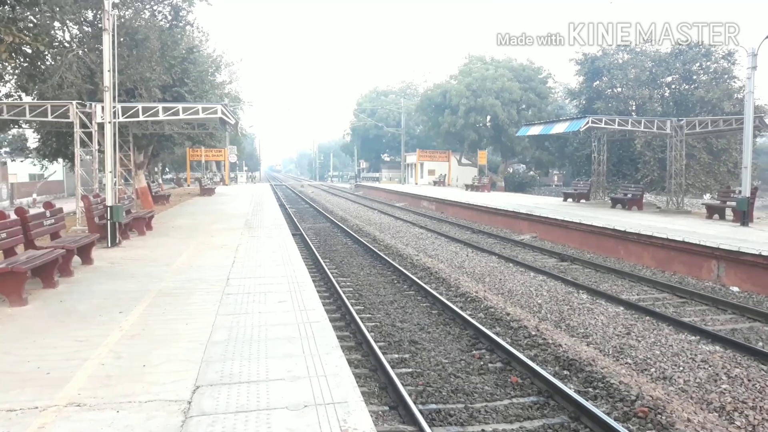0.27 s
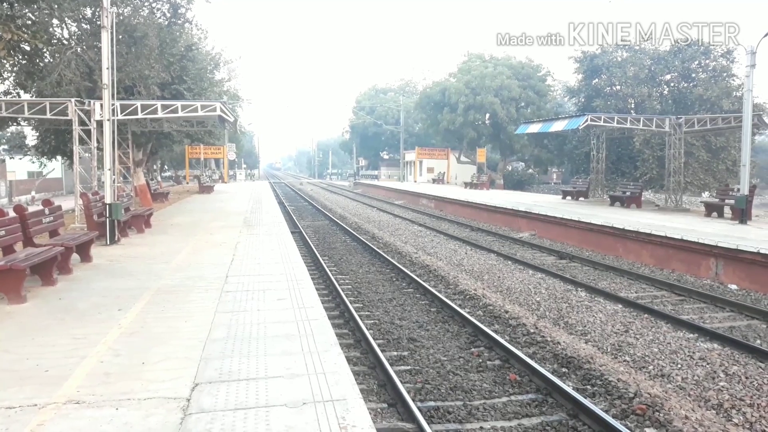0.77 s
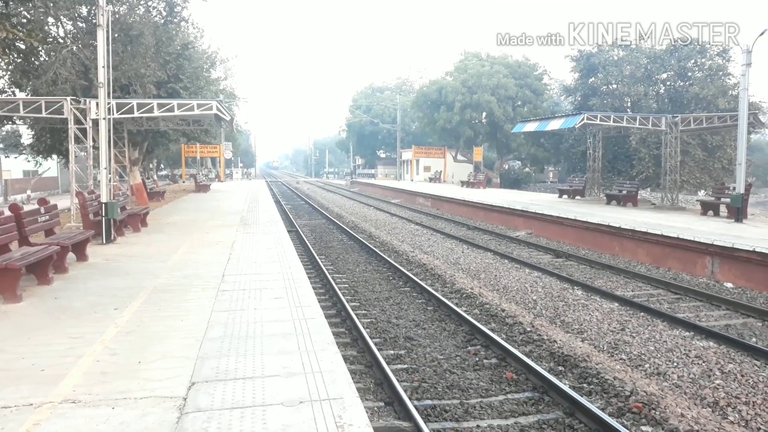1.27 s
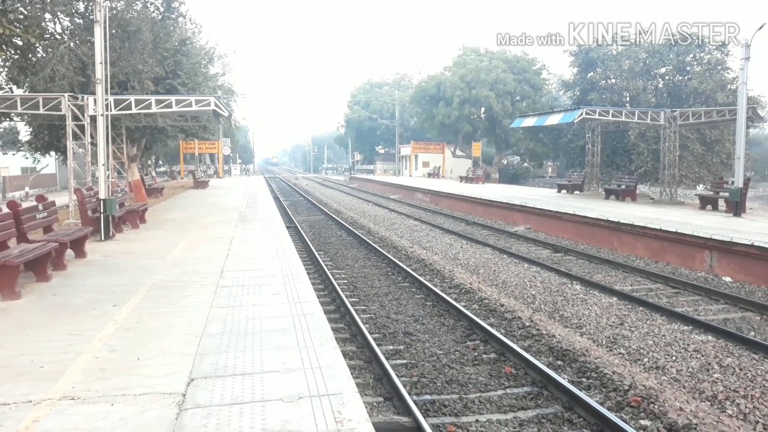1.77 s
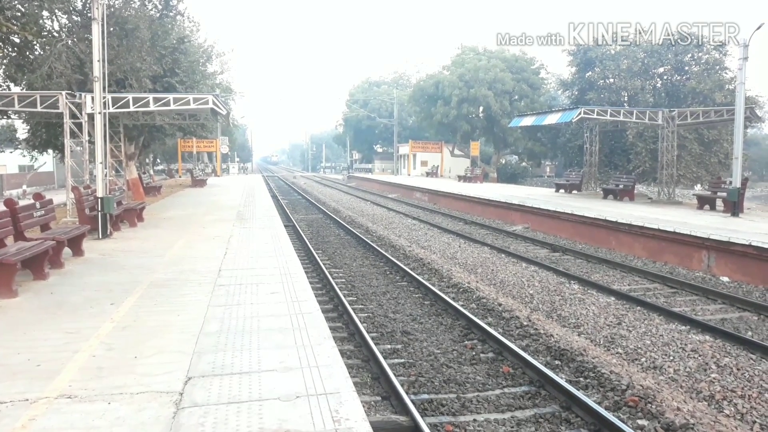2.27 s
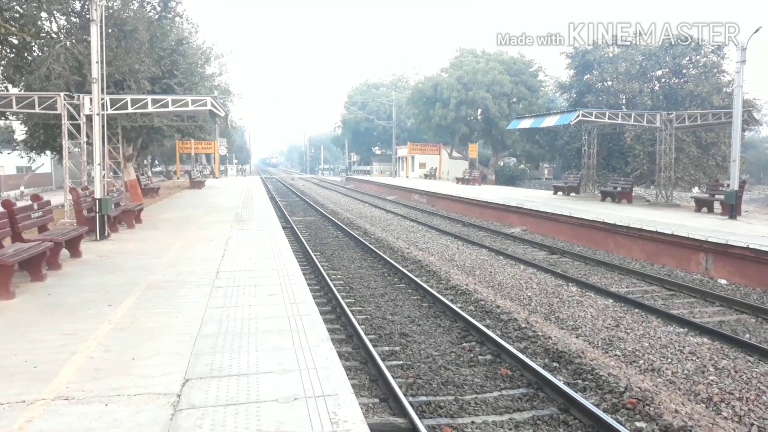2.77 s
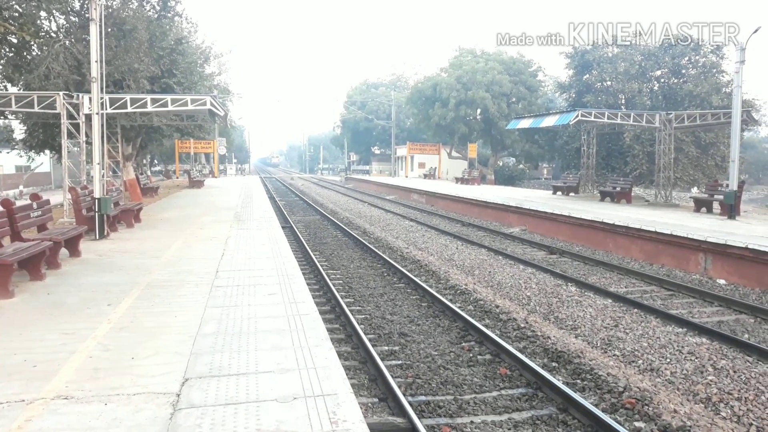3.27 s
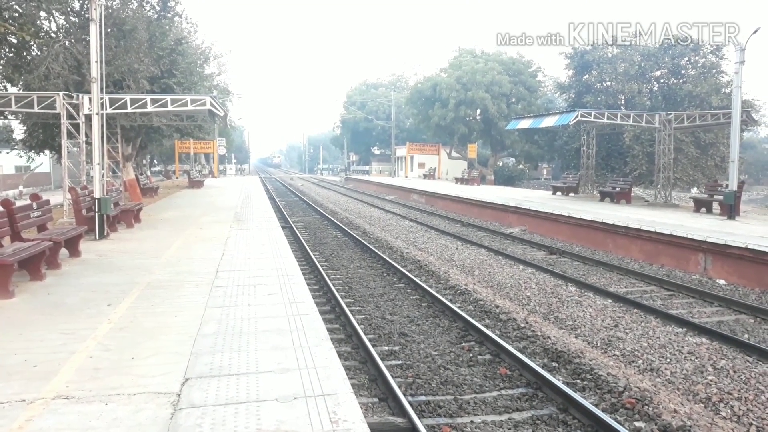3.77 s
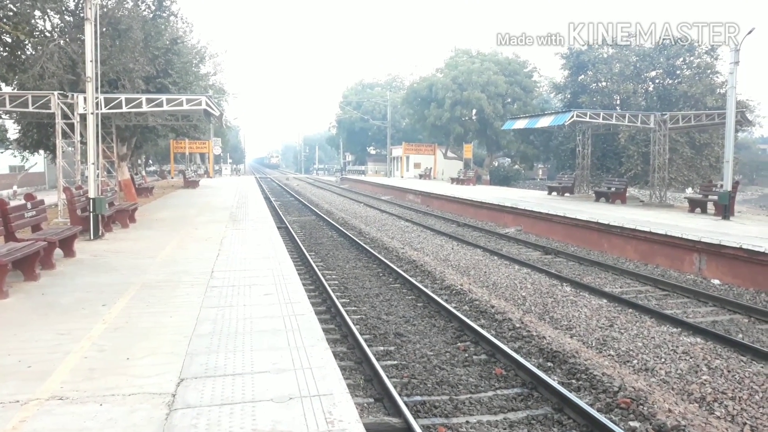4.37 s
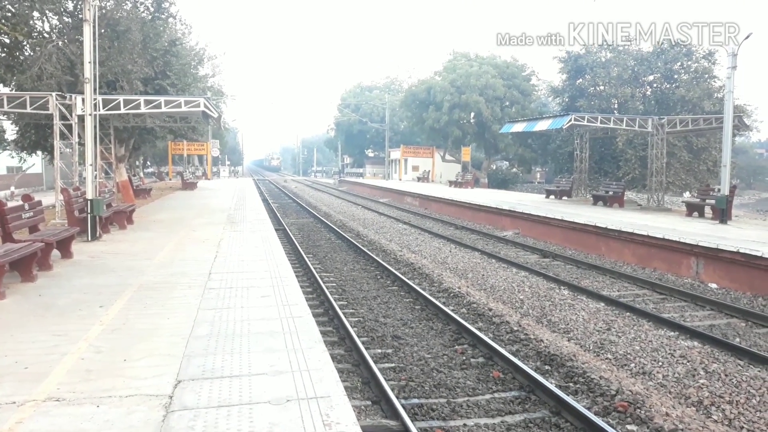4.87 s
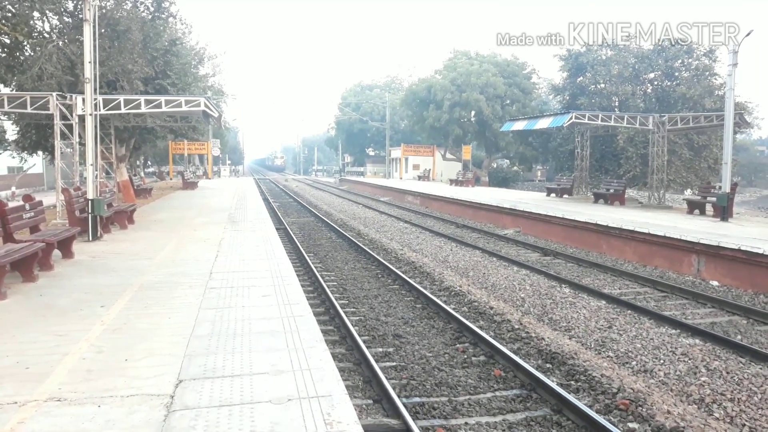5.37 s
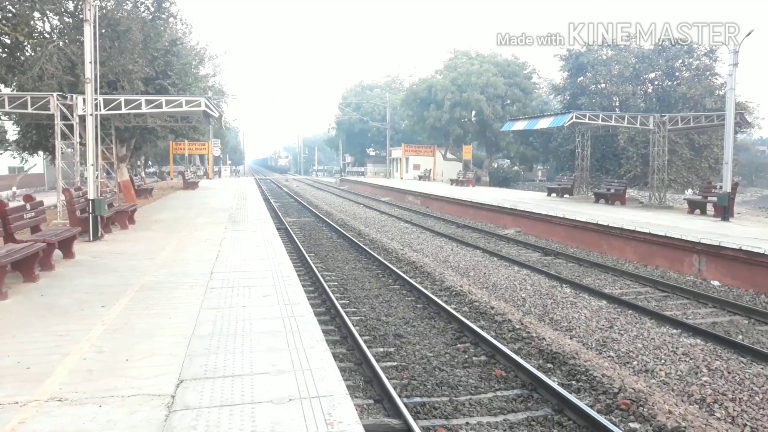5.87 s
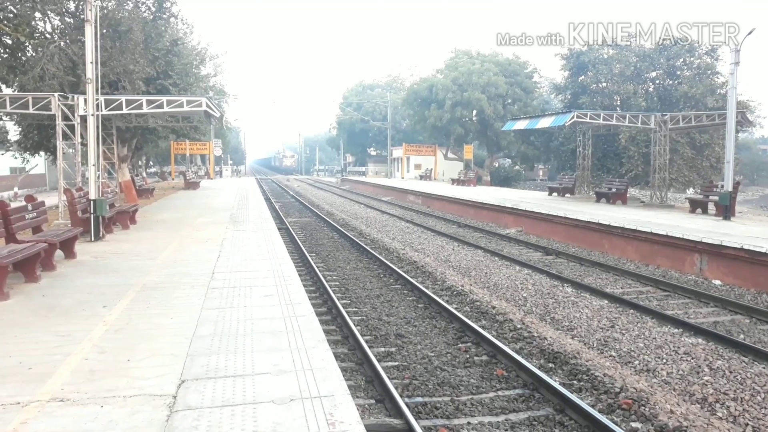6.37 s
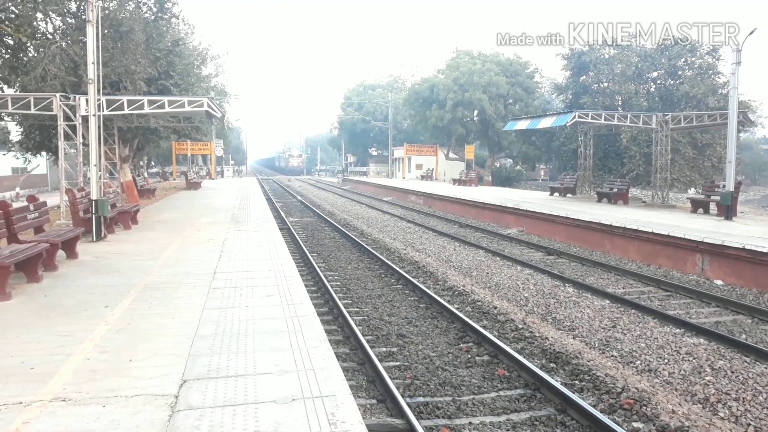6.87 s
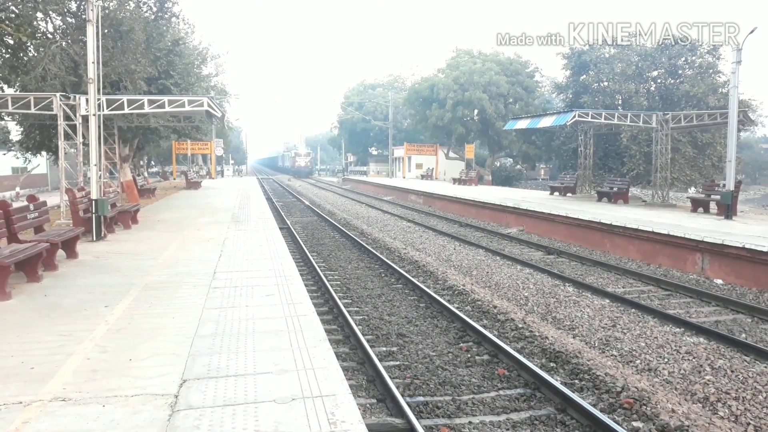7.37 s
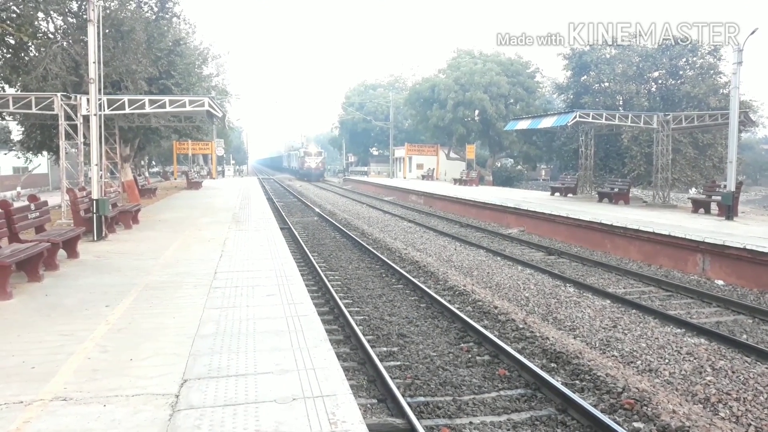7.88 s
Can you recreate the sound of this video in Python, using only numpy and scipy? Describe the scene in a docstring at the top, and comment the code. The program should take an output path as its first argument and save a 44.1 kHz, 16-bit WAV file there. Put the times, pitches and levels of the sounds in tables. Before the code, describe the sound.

The scene opens partway through a distant train's horn blast, a strong, hollow, reedy single note a little above middle D, its third harmonic loudest. From about 0.6 seconds it weakens, drifting slightly sharp as the air drains, while lower-pitched, rough echoes return from trees. Faint low engine rumble and soft hiss remain, with light gritty shoe scuffs at 0.3, 1.2 to 1.6 and 2.6 to 3.2 seconds. At 3.3 the second blast swells up, brighter and brassier, until 4.7. A bird gives a short rasp at 4.4, then repeated quick falling whistles until about 7.5. The third blast starts near 5.1 and holds, wavering, until 7.35, then decays in echoes. From about 7.4 hiss returns and thin, very high metallic ringing shimmers from the rails to the end, at about 8.1. The train stays distant throughout.

```python
"""A diesel goods train sounds its single air horn three times as it runs towards a country platform.
The horn is a stack of harmonics steered by air pressure: flatter as it builds, sharper as it drains.
Trees and masts along the line return it as narrow noise bands, most of them Doppler shifted lower.
Under it lie shaped-noise rumble, a background hiss and shoe scuffs, and a bird of gliding sines;
towards the end the rails sing, as noise ringing in high resonances."""
import sys
import numpy as np
from scipy import signal
from scipy.fft import rfft, irfft, next_fast_len
from scipy.io import wavfile
from scipy.ndimage import uniform_filter1d, minimum_filter1d

SR = 44100
rng = np.random.default_rng(int(sys.argv[2]) if len(sys.argv) > 2 else 0)


def log_audio(samples):
    """Write samples as a 16-bit WAV file to the path given in sys.argv[1]."""
    # one column per channel
    frames = np.atleast_2d(samples).T
    # limit to full scale, then quantise
    limited = np.clip(frames, -1, 1)
    pcm = np.round(limited * 32767).astype(np.int16)
    wavfile.write(sys.argv[1], SR, pcm)


N = 358533
T = np.arange(N) / SR  # seconds

# Spectrum shape of the far rumble. Each row: frequency in Hz, density in dB per Hz.
RUMBLE_SPECTRUM = [(15, -46.5), (25, -22), (59, -2.5), (97, -4), (199, -2.5), (344, -2.5), (401, -8),
                   (484, -9), (528, -18.5), (565, -1.5), (605, -10.5), (730, -6.5), (1160, -10),
                   (1260, -19), (1500, -13.5), (1950, -49), (3300, -120)]
# Spectrum shape of the background hiss. Each row: frequency in Hz, density in dB per Hz.
HISS_SPECTRUM = [(1100, -27.5), (1500, -4), (1850, -0.5), (2100, 2), (2350, -8), (2780, 2), (3200, -12),
                 (3800, -14.5), (5200, -16.5), (6000, -33), (7200, -30.5), (8500, -46.5), (15000, -43)]
RUMBLE_DB, HISS_DB = -35, -49  # base levels, before the slow changes move them
# Slow changes through the scene. Each row: time in seconds, background level offset in dB,
# level of the echoes from ahead in dB, treble tilt of the brassy overtones at 8 kHz in dB.
SLOW_CHANGES = [(0, 0, -21, -18), (2.2, 3, -18, -18), (3.3, 3, -19, -6), (4.4, -1.5, -20, 0.5),
                (5, 4, -21.5, 0), (5.8, -4.5, -17, -3), (6.6, -9, -15.5, -1), (7.4, 5, -17.5, 3),
                (8.13, 6, -20.5, -12)]

# A bird's falling whistles. Each row: start in seconds, length in seconds, highest pitch in Hz, level in dB.
WHISTLES = [(4.715, .125, 5000, -41), (4.94, .16, 5000, -44.5), (5.2, .13, 5050, -49),
            (5.49, .11, 4700, -45), (5.715, .12, 5000, -45), (6.02, .11, 4600, -44),
            (6.284, .13, 4500, -43), (6.56, .11, 4500, -47), (6.82, .12, 4500, -50), (7.37, .12, 4500, -48)]
WHISTLE_END_HZ = 3600

# Shoe scuffs and grit on the platform. Each row: start in seconds, length in seconds, level in dB.
SCUFFS = [(0.348, 0.23, -58.5), (1.165, .008, -54), (1.44, .12, -61), (1.56, 0.11, -63), (2.6, .06, -67),
          (2.727, .07, -59), (2.892, 0.065, -53), (2.97, 0.077, -60), (3.057, 0.067, -57),
          (3.13, 0.053, -58), (3.21, .06, -64)]
# Spectrum shape of the grit. Each row: frequency in Hz, density in dB per Hz.
SCUFF_SPECTRUM = [(2000, -24.5), (3400, 7), (5000, 3.5), (6400, 3), (7600, -9.5), (9000, -26), (14000, -39)]

# Resonances of the high ringing. Each row: frequency in Hz, width in Hz, relative level in dB.
RING_MODES = [(6900, 450, 6), (7950, 820, -10), (11280, 150, -1), (12150, 400, -7), (12550, 140, 3.5),
              (13300, 700, -12), (14400, 700, -14)]
# A faint high click at 5.69 s, then bursts of high ringing. # Each row: peak in seconds, level in dB before
# trim, decay in seconds.
RING_BURSTS = [(5.69, -66, .04), (7.48, -50, .13), (7.79, -55, .4), (8, -54, .15), (8.12, -51, .15)]
RING_RISE_S = .035

# Pulls on the horn valve. Each row: opening in seconds, closing in seconds,
# full-pressure level of the second harmonic in dB.
BLASTS = [(-1, .62, -29.3), (3.325, 4.727, -24), (5.07, 7.35, -26.8)]
# Horn tone at full pressure; from the fifth harmonic up it sets the balance within a group.
# Each row: harmonic number, level in dB.
HORN_TONE = [(1, -8), (2, -17), (3, 0), (4, -13), (5, -26), (6, -24), (7, -29), (8, -30), (9, -28.5),
             (10, -32.5), (11, -42.5), (12, -45), (13, -49.5), (14, -40), (15, -43.5), (16, -43.5),
             (17, -42), (18, -47), (19, -51), (20, -52), (21, -58.5), (22, -55.5), (23, -60.5), (24, -62),
             (25, -62.5), (26, -65), (27, -66.5), (28, -75.5), (29, -76), (30, -83), (31, -77), (32, -81),
             (33, -77)]
# Tone of the flat echo from behind. Each row: harmonic number, level in dB.
BACK_TONE = [(1, -5.5), (2, -15), (3, 1.5), (4, -7), (5, -15), (6, -21), (7, -18), (8, -19.5), (9, -27.5),
             (10, -21), (11, -23.5), (12, -28), (15, -25.5), (20, -37)]
# Reflectors behind the engine hear it receding. Each row: pitch ratio to the direct sound, relative level in dB.
BEHIND = [(.854, -32), (.86, -2), (.864, 0), (.87, -6), (.88, -14), (.896, -18), (.902, -6), (.908, -18),
          (.95, -28)]
# Reflectors beside and ahead hear it approaching. Each row: pitch ratio to the direct sound, relative level in dB.
AHEAD = [(.84, -26), (.9, -16), (.94, -11), (.97, -6), (.995, 0), (1.012, -18), (1.1, -21), (1.14, -30)]
HORN_HZ, SHARP_HZ = 307.5, 14.7  # pitch at full pressure, and its rise when the air is all but gone
SPEAK_S, DRAIN_S = .235, 1.48  # times for the tone to speak and to drain away
SETTLE_S, SHARPEN_S = .55, .84  # times for the pitch to settle and to rise again
# How the horn weakens as pressure falls: harmonics 1, 2, 3, 4, the middle ones, then the brassy overtones.
# Each row: loss when empty in dB, power of the pressure drop, lag in seconds.
STARVED = [(15, .94, 0), (45, 1.42, 0), (66, 1.01, 0), (110, 1.08, .025), (66, 1.1, .015), (52, 1.12, .04)]
STALL_PRESSURE = .64  # share of full pressure under which the reed begins to die out
# Strength of the echo from behind the engine. Each row: time in seconds, level in dB before trim.
BACK_LEVEL = [(.6, -28), (3.7, -36), (4.4, -37), (4.77, -26), (5.15, -36), (6.4, -31), (7.1, -29.5),
              (7.45, -25.5), (7.8, -31)]
# Slow fading on the way to the platform, as at full pressure, for five parts of the tone.
# The fundamental. Each row: time in seconds, level in dB.
FUNDAMENTAL_LEVEL = [(.1, -17.6), (.9, -21.5), (3.6, -17.3), (4.05, -20.9), (4.7, -17.8), (5.36, -13.4),
                     (5.72, -21.6), (5.87, -13.7), (6.42, -14.3), (6.64, -20.3), (7, -12.8), (7.15, -18.7),
                     (7.3, -13.5), (7.55, -16), (7.64, -23), (7.72, -14), (7.83, -14.5), (7.9, -21),
                     (7.98, -11.5)]
# The third harmonic, the horn's loudest. Each row: time in seconds, level in dB.
THIRD_LEVEL = [(0.1, -9.5), (0.6, -9.2), (3.7, -8.0), (4.05, -11.1), (4.6, -9.5), (5.3, -10.1),
               (5.77, -7.4), (5.93, -9.4), (6.2, -7.6), (6.29, -9.6), (6.4, -6.9), (6.75, -5.8),
               (7.3, -8.2)]
# The fourth harmonic. Each row: time in seconds, level in dB.
FOURTH_LEVEL = [(0.1, -33.8), (0.6, -25.8), (3.55, -25.9), (3.75, -19.6), (4.05, -23.8), (4.6, -20.5),
                (5.5, -19.7), (6.5, -22.1), (6.95, -30.1), (7.3, -25.3)]
# The middle harmonics, 5 to 7. Each row: time in seconds, level in dB.
MIDDLE_LEVEL = [(.1, -38), (.7, -40.5), (3.6, -31.5), (4, -33), (4.55, -29.5), (5.3, -35), (5.85, -30.5),
                (6.2, -36), (6.75, -36.5), (7.2, -32)]
# The brassy overtones, 8 and up. Each row: time in seconds, level in dB.
BRASS_LEVEL = [(.7, -40.5), (3.58, -32), (4, -38.5), (4.6, -36.5), (5.25, -37.5), (5.7, -35.5),
               (6.6, -35.5), (7.3, -38)]
TOP_HZ = 15480  # the final treble cut


def undb(db):
    """Decibels to gain."""
    return 10 ** (np.asarray(db) / 20)


def unit(x):
    """Scale to rms 1."""
    return x / np.sqrt(np.mean(np.abs(x) ** 2))


def curve(rows):
    """Join (seconds, value, ..) rows by straight lines, one curve a column."""
    seconds, *columns = np.transpose(rows)
    return [np.interp(T, seconds, column) for column in columns]


def walk(rate):
    """Smooth chance with spread near 1, changing about rate times a second."""
    steps = rng.standard_normal(1024)
    fine = len(steps) * 8
    return np.interp(T * rate + rng.random(), np.arange(fine) / 8, signal.resample(steps, fine))


def noise(gain_at):
    """Noise of rms 1 whose spectrum is a function of frequency."""
    size = next_fast_len(N, True)
    gain = gain_at(np.fft.rfftfreq(size, 1 / SR) + 1)
    white = rfft(rng.standard_normal(size))
    return unit(irfft(white * gain, size)[:N])


def coloured(points):
    """Noise of rms 1 with a spectrum of (Hz, dB) points."""
    hz, db = np.transpose(points)
    return noise(lambda f: undb(np.interp(np.log(f), np.log(hz), db, left=-90, right=-90)))


def swell(start, length):
    """A rounded burst."""
    along = np.clip((T - start) / length, 0, 1)
    return np.sqrt(np.abs(np.sin(np.pi * along)))


def distance(swell_db=.6, rumble_share=.05):
    """Far engine rumble, nearly steady, and a hiss that sinks under the long blasts and comes back."""
    offset_db, _, _ = curve(SLOW_CHANGES)
    rumble = coloured(RUMBLE_SPECTRUM) * undb(RUMBLE_DB + rumble_share * offset_db + swell_db * walk(9.3))
    hiss = coloured(HISS_SPECTRUM) * undb(HISS_DB + offset_db)
    return rumble + hiss


def scuffs(grit_db=3):
    """Soles drag briefly over gritty concrete: bursts of high noise with a grainy level."""
    drags = sum(undb(db) * swell(start, length) for start, length, db in SCUFFS)
    return coloured(SCUFF_SPECTRUM) * undb(grit_db * walk(140)) * drags


def bird(rasp_db=-38, rasp_hz=3720, arch_hz=220, rasp_width_hz=130, crest=.22):
    """One arched rasping note, then a run of whistles that crest early and fall ever faster."""
    rasp = swell(4.435, .16)
    rough = noise(lambda f: np.exp(-(f / rasp_width_hz) ** 2 / 2))
    rasp_phase = 2 * np.pi * np.cumsum(rasp_hz + arch_hz * rasp ** 2) / SR
    out = undb(rasp_db) * rasp * rough * np.sin(rasp_phase)
    quaver_hz = 35 * walk(110)
    for start, length, high_hz, db in WHISTLES:
        along = np.clip((T - start) / length, 0, 1)
        fall = np.abs((along - crest) / (1 - crest)) ** 1.4
        hz = high_hz + (WHISTLE_END_HZ - high_hz) * fall + quaver_hz
        out = out + undb(db) * swell(start, length) * np.sin(2 * np.pi * np.cumsum(hz) / SR)
    return out


def rails(level_db=2, shimmer_db=.6):
    """A faint high click at 5.69 s; later, wheel vibration runs ahead through the steel and rings its high
    resonances."""
    def resonances(f):
        return np.sqrt(sum(undb(2 * db) / (1 + (2 * (f - hz) / width) ** 2) for hz, width, db in RING_MODES))

    bursts = []
    for peak, db, decay_s in RING_BURSTS:
        fade = np.maximum((peak - T) / RING_RISE_S, (T - peak) / decay_s)
        bursts.append(undb(db) * np.exp(-fade))
    # bursts add as powers
    return noise(resonances) * np.linalg.norm(bursts, axis=0) * undb(level_db + shimmer_db * walk(40))


def pressure_drop(fill_s, drain_s):
    """Missing air pressure, 0 (full) to 1 (empty): it closes up when the valve opens, grows once it shuts."""
    drop = np.ones(N)
    for opens, closes, _ in BLASTS:
        filling = np.interp(opens, T, drop) * np.clip(1 - (T - opens) / fill_s, 0, 1) ** 2
        draining = np.maximum(T - closes, 0) / drain_s
        drop = np.where(T < opens, drop, np.minimum(filling + draining, 1))
    return drop


def linger(gain, seconds):
    """Echoes build up and die away behind the sound that feeds them: smooth its power."""
    keep = np.exp(-1 / (seconds * SR))
    power, _ = signal.lfilter([1 - keep], [1, -keep], gain ** 2, zi=[gain[0] ** 2])
    return np.sqrt(power)


def scattered(hz, reflectors):
    """One partial returned by countless reflectors, each with its own Doppler shift: a noise band."""
    ratio, db = np.transpose(reflectors)
    return noise(lambda f: undb(np.interp(f / hz, ratio, db, left=-120, right=-120)))


def back_echo(level_db=-1.2, delay_s=.15, tail_s=.16, starved_db=52):
    """The trees behind the engine return the horn late and more than a tone flat, beating roughly against it."""
    harmonics, tone_db = np.transpose(BACK_TONE)
    chord = sum(undb(np.interp(k, harmonics, tone_db)) * scattered(k * HORN_HZ, BEHIND) for k in range(1, 21))
    drop = np.interp(T - delay_s, T, pressure_drop(SPEAK_S, DRAIN_S))
    strength_db, = curve(BACK_LEVEL)
    return chord * linger(undb(-starved_db * drop), tail_s) * undb(level_db + strength_db)


def blast_levels():
    """Gains of harmonics 1 to 4, the middle and the brassy ones; the fundamental loses least as air runs out."""
    drop = pressure_drop(SPEAK_S, DRAIN_S)
    second_level = [(s, db) for opens, closes, db in BLASTS for s in (opens, closes)]
    levels = (FUNDAMENTAL_LEVEL, second_level, THIRD_LEVEL, FOURTH_LEVEL, MIDDLE_LEVEL, BRASS_LEVEL)
    gains = []
    for rows, (loss_db, power, lag_s) in zip(levels, STARVED):
        full_db, = curve(rows)
        late = np.interp(T - lag_s, T, drop)
        sounding = np.clip((1 - late) / STALL_PRESSURE, 0, 1) ** 2
        gains.append(sounding * undb(full_db - loss_db * late ** power))
    return gains


def horn(top_db=2, brass_limit_db=-16, flutter_db=.35, weak_flutter_db=4.5, fade_db=2.2, shimmer_db=1.9,
         wobble=.02, echo_s=.25, echo_rise_db=9, bass_echo_db=-2, top_echo_db=-5.5, bite_db=50):
    """A reed and flared pipe: clean harmonics that waver in moving air, each with a skirt of echoes from ahead."""
    hz = HORN_HZ + SHARP_HZ * pressure_drop(SETTLE_S, SHARPEN_S)
    drop = pressure_drop(SPEAK_S, DRAIN_S)
    _, wet_db, tilt_db = curve(SLOW_CHANGES)
    phase = 2 * np.pi * np.cumsum(hz) / SR
    *low, middle, brass = blast_levels()
    tone = undb(np.array(HORN_TONE)[:, 1])
    middle = middle / np.linalg.norm(tone[4:7])
    # a weakly blown reed swings smoothly and makes few overtones
    brass = np.minimum(brass, low[2] * undb(brass_limit_db)) / np.linalg.norm(tone[7:10])
    wet, air, out = undb(wet_db), walk(9), 0
    for k, share in enumerate(tone, 1):
        height = np.clip(np.log2(k / 10), 0, 1)  # 0 up to the tenth harmonic, 1 from the twentieth
        if k <= len(low):
            gain = low[k - 1]
            fading_db = (flutter_db + weak_flutter_db * drop) * walk(20)
        else:
            fading_db = fade_db * walk(5) + shimmer_db * walk(26)
            if k < 8:
                gain = share * middle
            else:
                # the highest overtones need full pressure, and a changing tilt dulls or brightens them
                treble_db = (top_db - bite_db * drop) * height + tilt_db * (k * hz / 8000) ** 2
                gain = share * brass * undb(treble_db)
        waver = wobble * k * (air + .5 * walk(30))  # radians
        direct = np.sqrt(2) * np.sin(k * phase + waver + 2 * np.pi * rng.random())
        # short waves scatter more readily from leaves and masts, the shortest fade on the longer path
        scatter_db = bass_echo_db if k <= 3 else echo_rise_db * np.log2(k / 3) + top_echo_db * height
        echo = linger(gain, echo_s) * wet * undb(scatter_db) * scattered(k * HORN_HZ, AHEAD)
        out = out + gain * undb(fading_db) * direct + echo
    return out


def scene():
    """Everything as it reaches the platform."""
    return (horn() + back_echo() + distance() + rails() + bird() + scuffs())[None]


def record(dry, drive_db=.25):
    """A soft 8 ms opening, a limiter that holds the peaks at full scale, then a steep treble cut."""
    fade_in = np.sin(np.pi / 2 * np.minimum(T / .008, 1)) ** 2
    dry = dry * undb(drive_db) * fade_in
    headroom = minimum_filter1d(1 / np.maximum(np.abs(dry), 1), size=501)
    limited = dry * uniform_filter1d(headroom, size=501)
    return signal.sosfilt(signal.ellip(10, .2, 80, TOP_HZ, fs=SR, output="sos"), limited)


dry = scene()
out = record(dry)
log_audio(out)
```